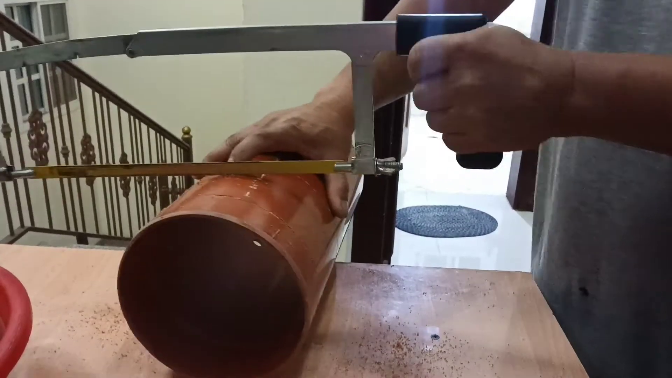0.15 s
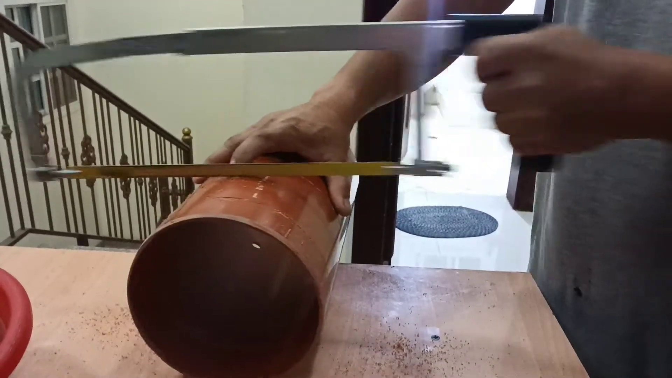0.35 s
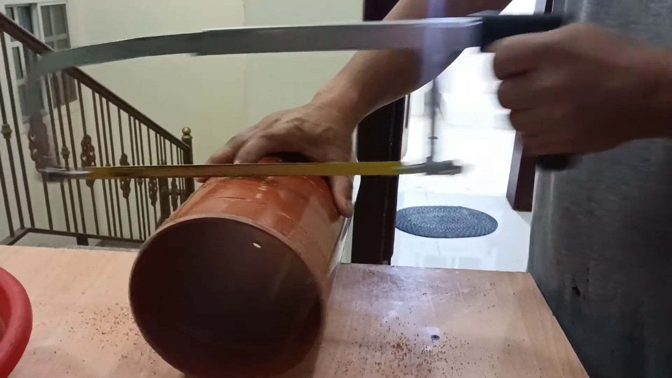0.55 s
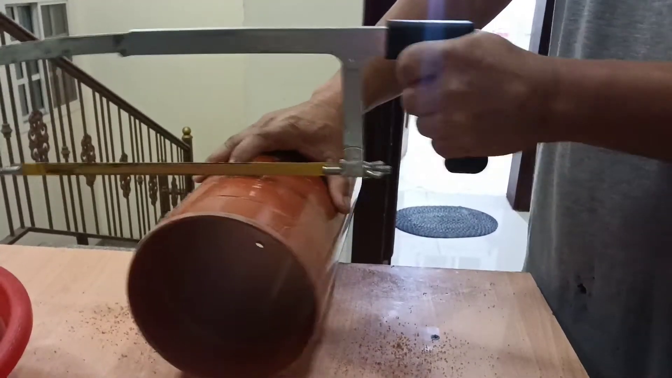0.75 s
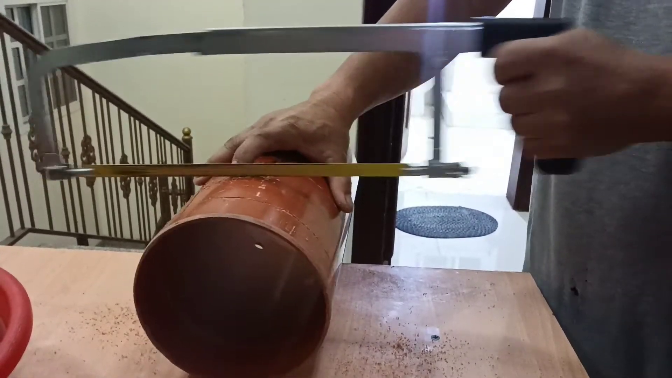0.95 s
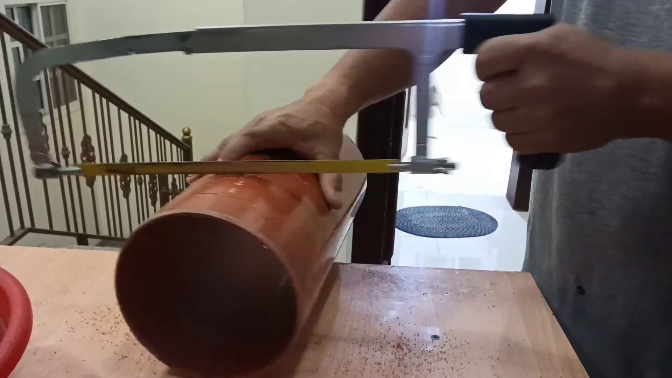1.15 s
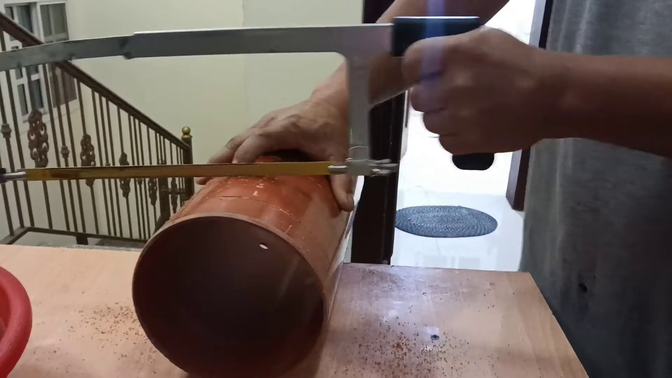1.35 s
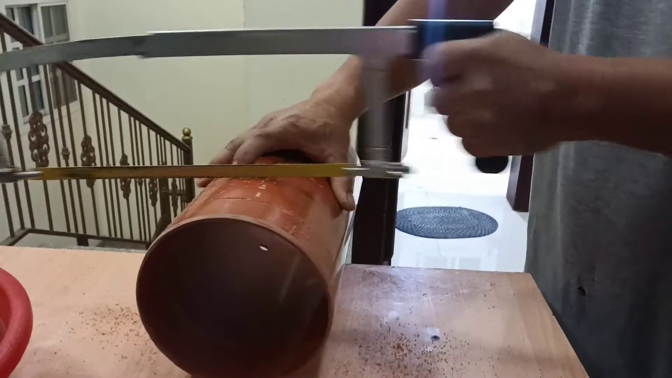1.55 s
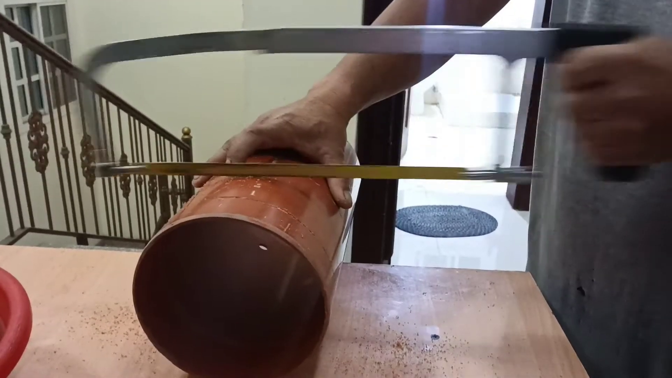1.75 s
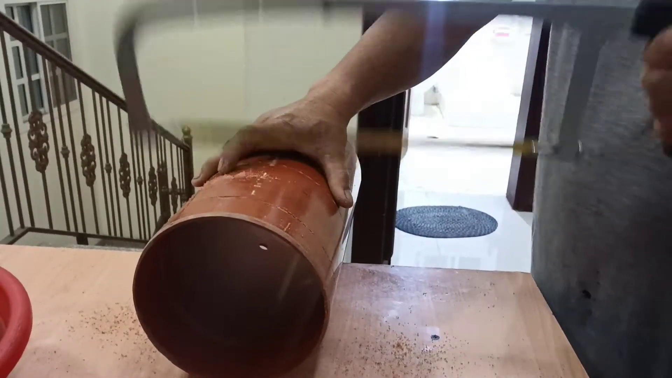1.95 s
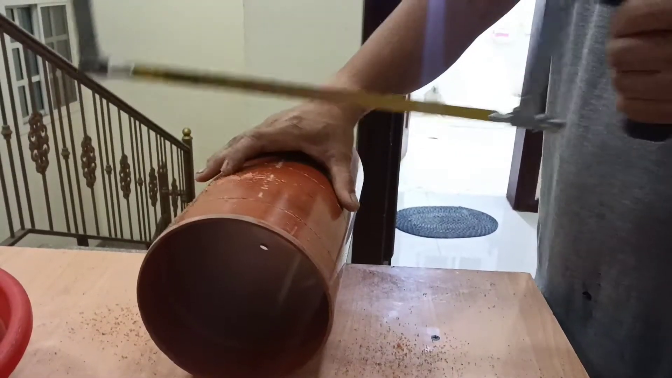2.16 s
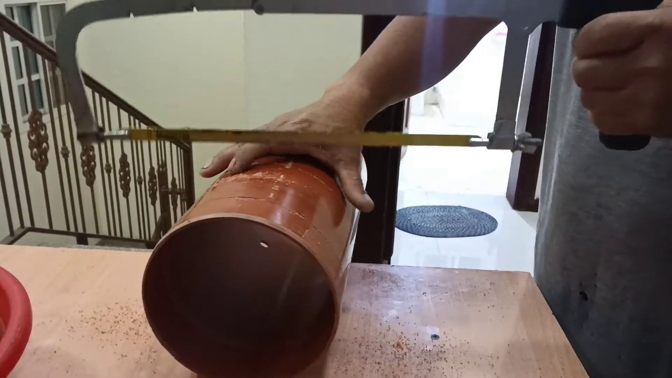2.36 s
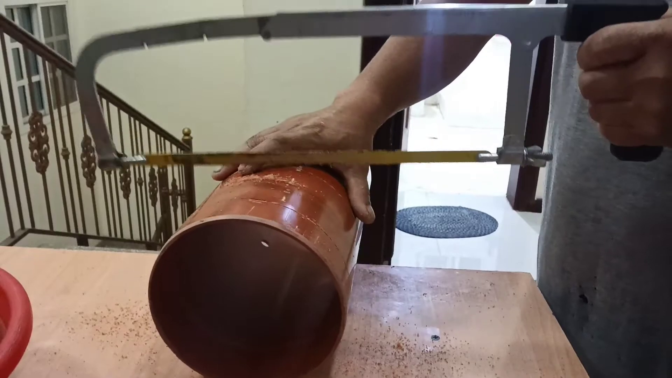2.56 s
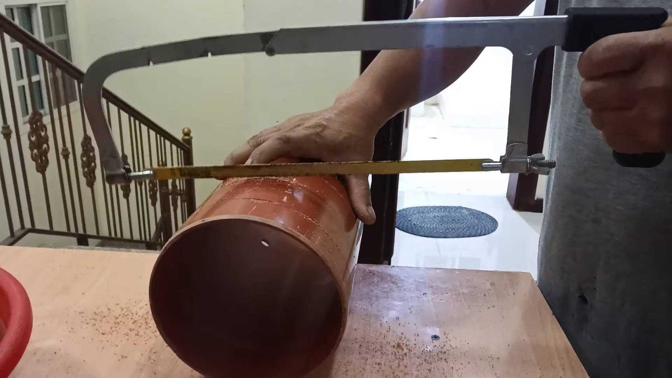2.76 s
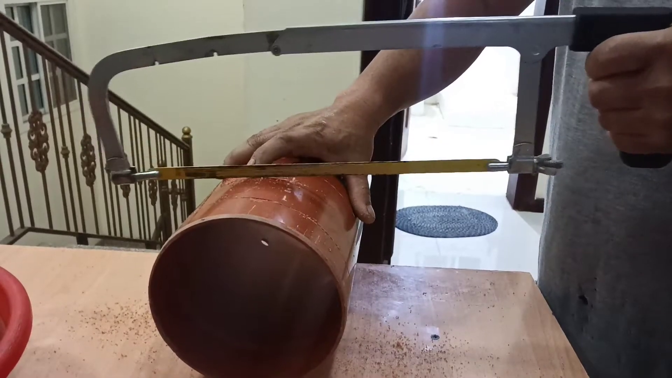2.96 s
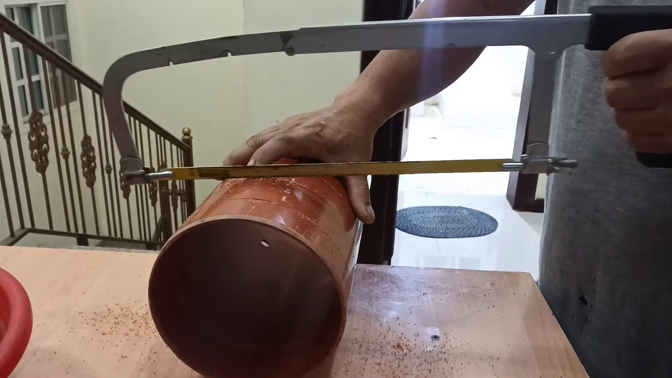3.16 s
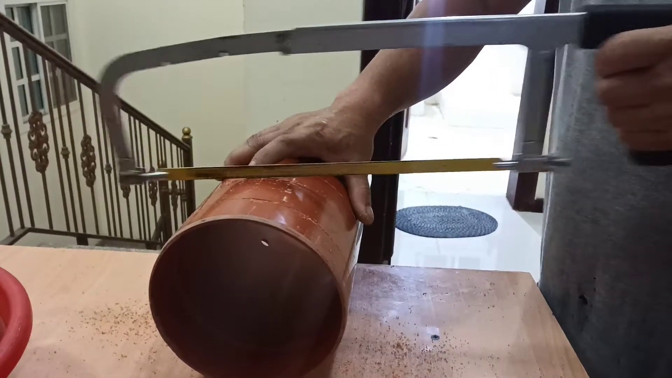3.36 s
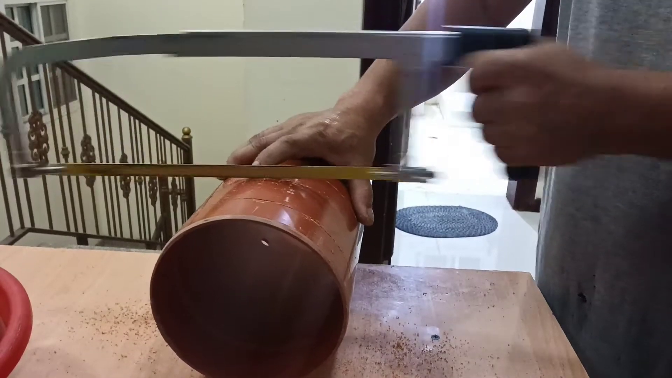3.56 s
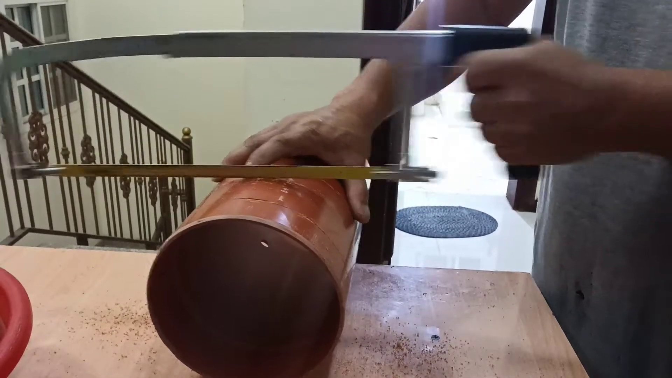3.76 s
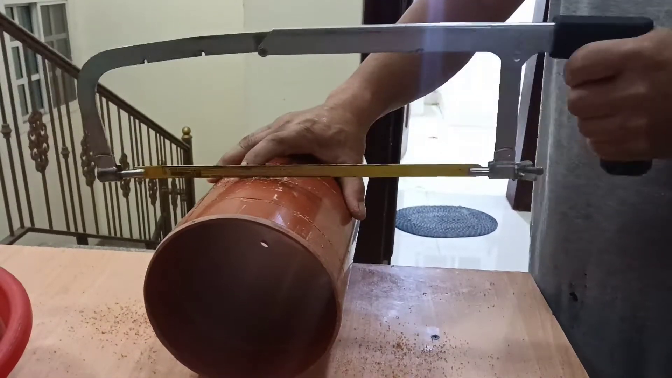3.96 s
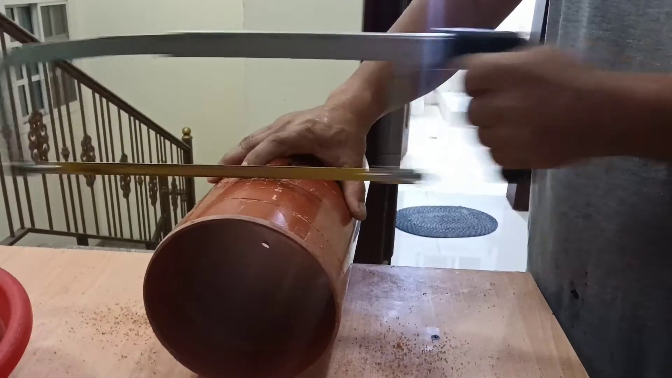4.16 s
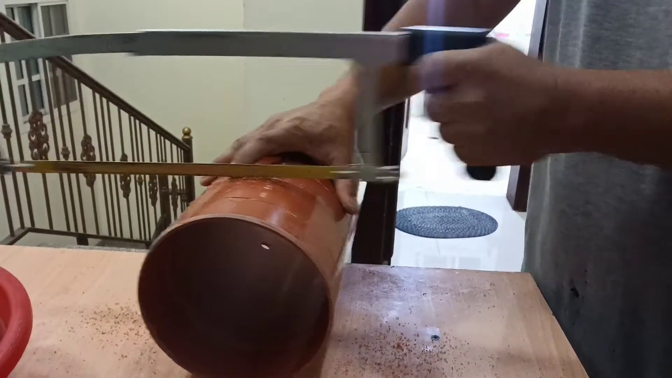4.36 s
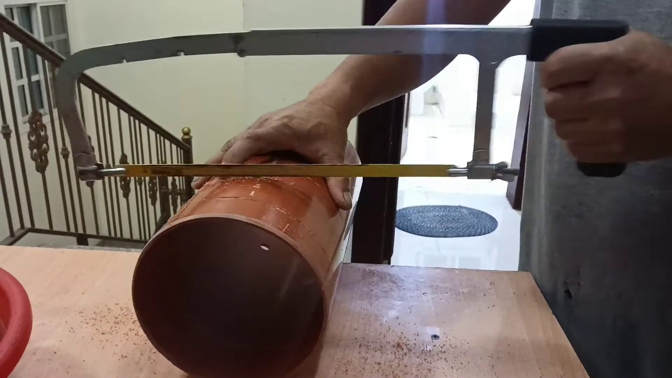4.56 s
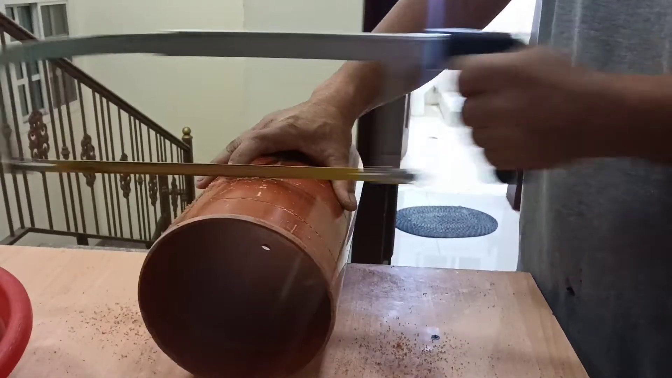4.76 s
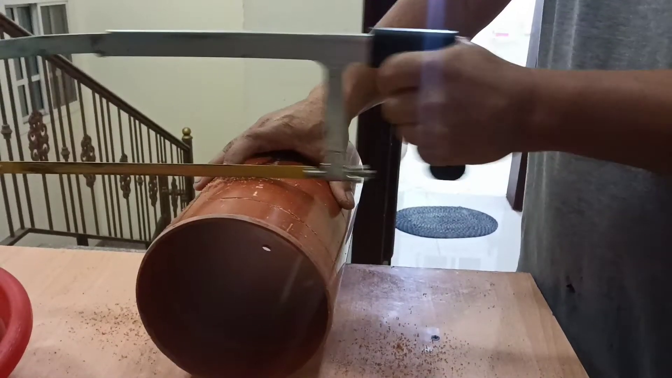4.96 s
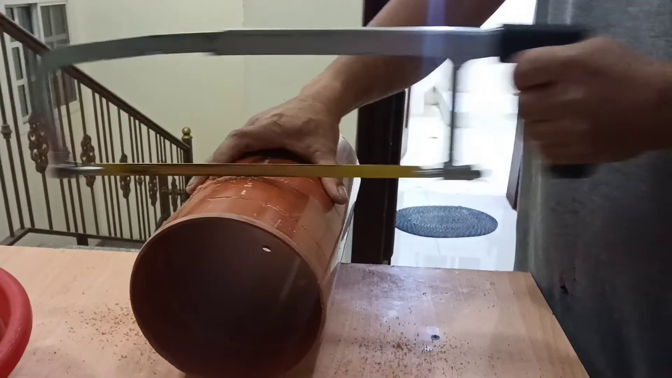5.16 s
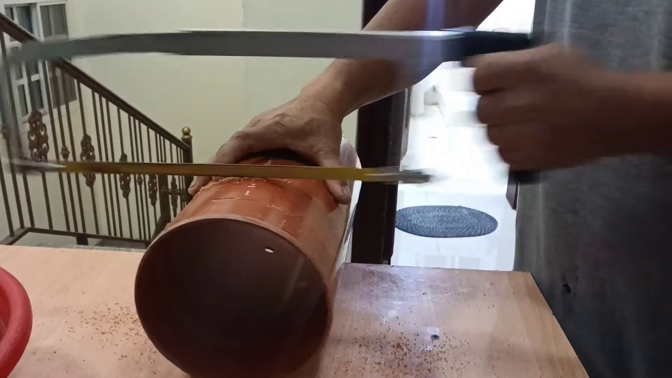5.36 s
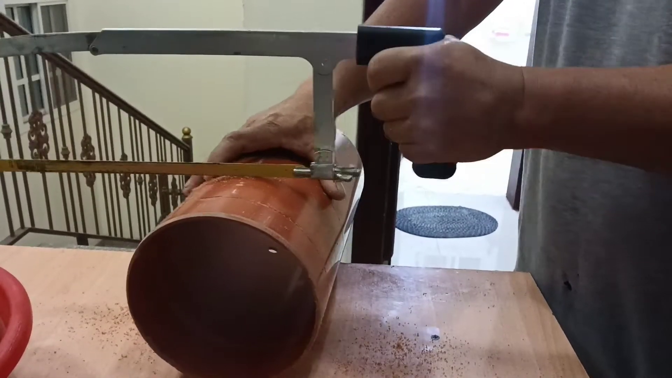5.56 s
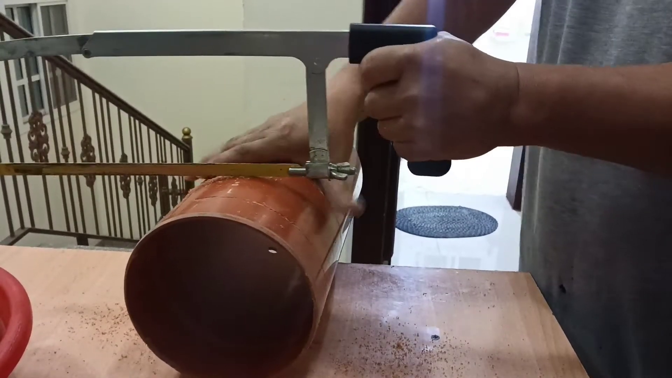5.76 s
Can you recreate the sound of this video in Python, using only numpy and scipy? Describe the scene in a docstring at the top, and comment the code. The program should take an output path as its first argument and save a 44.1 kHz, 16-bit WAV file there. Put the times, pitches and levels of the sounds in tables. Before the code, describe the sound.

A hacksaw rasps back and forth through a wide hollow plastic pipe in two runs, with knocks between them and twanging blade near the end.

```python
"""First a rasping stroke with a hard bite, then push and pull in turn: a hacksaw cuts a wide plastic pipe
on a bench by an open door, in two runs. Random tooth bites excite pipe, steel frame and bench as resonators;
teeth in step with the pipe sing as gliding tones, and the taut blade twangs as a plucked string when a stroke
jams. Between the runs the saw is set down on the pipe: impulses through modes, skids and faint scrapes.
A hard-walled landing answers with sparse echoes, over the shaped noise of distant street and house hum."""
import sys
import numpy as np
from scipy import signal
from scipy.fft import rfft, irfft, next_fast_len
from scipy.io import wavfile

SR = 44100
rng = np.random.default_rng(int(sys.argv[2]) if len(sys.argv) > 2 else 0)


def transcribe(signal):
    """Save signal, clipped to [-1, 1], as a 16-bit WAV file at the path in sys.argv[1]."""
    frames = np.atleast_2d(signal).T
    limited = np.clip(frames, -1, 1)
    pcm = np.round(limited * 32767).astype(np.int16)
    wavfile.write(sys.argv[1], SR, pcm)


N = 256220

# All layer levels are relative; the mixes below add trims.
# Saw strokes, pushes and pulls in turn, a push first: start_s, rise_s, length_s, rasp_db, drift_to_end_db,
# first_bite_db, grind_over_rasp_db, fizz_over_rasp_db, hum_over_rasp_db, tooth pace at start_hz, middle_hz,
# end_hz, hum_joins_after_s, hum_drift_db
STROKES = [ (0.0, 0.0017, 0.13, -33, -5, 14, 4, -3.5, 12, 503, 501, 505, 0.0056, -3.5),
           (0.25, 0.048, 0.13, -24, -9, 4, 4.5, -11, 12.8, 682, 714, 658, .01, 5.5),
           (0.51, 0.033, 0.14, -25, 0.5, 2, -0.5, -3, 6.5, 713, 526, 484, .005, 0),
           (0.78, 0.061, 0.15, -24.5, -2.5, -0.5, 3, -9.5, 12.2, 668, 660, 728, 0.011, 3.5),
           (1.158, 0.029, 0.21, -25.5, -6.5, 8, 1, -5, 12.5, 630, 497, 485, .005, -6),
           (1.47, 0.14, 0.33, -18.5, -7.5, 0.5, 3, -10.5, 7.7, 650, 726, 553, 0.13, 7.5),
           (3.30, 0.029, 0.27, -25.5, 1.5, -10.5, -1.5, -4.5, 4.7, 718, 592, 530, 0.022, 2.5),
           (3.69, 0.1, 0.21, -22.5, -11, 6.5, 1.5, -7, 8.9, 634, 528, 592, 0.015, 6.5),
           (4.0, 0.021, 0.2, -25, 0, 1, -3.5, -3.5, 7.9, 677, 547, 515, 0.028, -4),
           (4.30, 0.017, 0.2, -25.5, -0.5, 2, 7, -13.5, 8.1, 513, 576, 644, 0.0075, 11),
           (4.61, 0.011, 0.18, -25.5, 2.5, -4.5, 2.5, -4, 14.6, 595, 626, 493, .01, -2),
           (4.92, 0.078, .24, -28.5, -4.5, 7, 7.5, -8.5, 18.5, 470, 516, 555, 0.016, 2.5),
           (5.25, 0.025, 0.17, -27, 2.5, 1, 3, -3, 12.2, 538, 546, 492, .01, 1),
           (5.47, 0.044, 0.21, -46, -32, -17, 14, -24, 32, 487, 470, 461, .01, -2), ]
# Spectra of the scraped wall (rasp), the low grind and the torn swarf (fizz): frequency_hz, density_db
RASP_SPECTRUM = [(2180, -26.5), (3700, -8.5), (3840, -1.5), (4230, -9.5), (4710, -6.5), (5680, -1),
                 (6220, -6.5), (8500, -12.5), (9090, -22), (10000, -20), (13000, -35), (22000, -120)]
GRIND_SPECTRUM = [(880, -50.5), (1500, -13), (2070, -4.5), (2170, -5), (2330, -1.5), (2410, 1), (2520, -7),
                  (2750, -1.5), (3140, -7), (3570, -5), (3900, -17), (5070, -30), (8580, -120)]
FIZZ_SPECTRUM = [(5290, 2.5), (9000, -2.5), (10100, 4), (11900, 9.5), (14700, 4), (15400, -7)]
# Modes of steel frame, pipe and bench: frequency_hz, width_hz (before the sharpness factor), level_db
FRAME_MODES = [(2090, 40, 0), (2230, 18, 2.5), (2318, 180, -14.5), (2680, 35, -10), (2670, 65, -37),
               (3480, 68, -15), (3635, 130, 2), (4135, 135, -4), (4450, 45, -26), (5570, 81, -4),
               (5350, 42, -31), (6550, 39, -11)]
PIPE_MODES = [(326, 130, -37), (417, 193, -25.5), (502.7, 20.5, 6.5), (525.4, 30, -1.5), (646, 64, -5),
              (695.5, 180, -2.5), (754, 69, 4), (799, 65, -6.5), (851, 78, 0), (1242, 120, -7),
              (1422, 47, -9.5), (1553, 40, -2.5)]
BENCH_MODES = [(46, 15, -9.5), (67.5, 9.3, 2.5), (105.7, 17, 8), (155, 23, -8.5)]
# Bench rocking under the strokes: middle_s, length_s, level_db
JOLTS = [(0.438, 0.29, -33.5), (0.694, 0.35, -35.5), (0.948, 0.23, -20.5), (1.218, 0.047, -25.5),
         (1.31, 0.066, -28), (1.756, 0.36, -27.5), (3.57, 0.11, -33), (3.865, 0.23, -23),
         (4.076, 0.094, -22), (4.189, 0.21, -34.5), (4.556, 0.33, -27), (4.76, 0.062, -22),
         (5.132, 0.26, -21.5), (5.409, 0.11, -17)]
# Teeth locked to a pipe mode: start_s, length_s, start_pitch_hz, end_pitch_hz, level_db, share_before_top
SINGING_NOTES = [(0.0, 0.17, 489.5, 479, -12.5, 0.11), (0.266, 0.044, 715, 700, -17.5, 1),
                 (0.654, 0.051, 482.6, 497, -20, 0.61), (0.895, 0.082, 700, 746, -32, .4),
                 (3.34, 0.048, 691, 712, -12, 0.97), (3.764, 0.13, 522, 533.6, -13, 0.32),
                 (4.126, 0.1356, 482.5, 503, -11, 0.96), (4.313, 0.18, 503, 622, -18, 0.71),
                 (4.473, 0.057, 547.4, 505, -17.5, 0.53), (5.026, 0.03, 490, 510, -6, 0.57)]
# Blade twangs: start_s, length_until_damped_s, level_db
TWANGS = [(4.786, .63, -5), (5.42, .45, -3.5)]
# Upper partials of the blade: multiple, level_db
UPPER_PARTIALS = [(3, 4.5), (4, 2), (5, 3.5), (6, -0.5), (7, -7), (8, -19), (9, -39), (10, -21)]
# Saw laid on the pipe: start_s, pipe_knock_db, bench_thud_db, steel_tick_db, skid_db, skid_length_s
KNOCKS = [(2.719, -19.5, -20, -42, -77, 0.043), (2.85, -15.5, -22, -31, -74, 0.22),
          (3.061, -51.5, -35, -65, -56, 0.051), (3.134, -53, -53, -31.5, -42.5, 0.048)]
# First contact of steel, one broad mode: frequency_hz, width_hz (before the sharpness factor), level_db
STEEL_CRACK = (2700, 4200, -12)
# Spectrum of the skidding blade: frequency_hz, density_db
SKID_SPECTRUM = [(1180, -62), (2000, -27), (2410, -23), (2510, -23), (2660, -12), (3490, 7), (4200, -17),
                 (4420, 0), (7710, -8), (9510, -14), (15000, -5.5)]
# Faint scrapes and squeaks while the saw is moved: start_s, length_s, frequency_hz, width_hz, level_db
SCRAPES = [(2.084, 0.16, 7670, 202, -77), (2.301, 0.14, 5350, 258, -62), (2.64, .07, 5800, 119.7, -69),
           (2.55, 0.57, 2225, 90.6, -54.5), (2.863, 0.18, 5140, 250, -62), (2.87, .2, 527, 115, -42.5),
           (2.94, 0.091, 7760, 400, -69), (2.97, 0.038, 3480, 60, -46.5), (3.22, 0.11, 1056, 60.3, -55.5)]
# Reverberation time of the landing: frequency_hz, t60_s
WALL_DECAY = [(100, 0.23), (500, 0.52), (2000, 0.37), (6000, 0.37), (14000, 0.23)]
# Reflected over direct sound: frequency_hz, level_db
WALL_LEVEL = [(100, -16), (250, -16), (480, -13), (650, -7), (900, -2), (2000, -1), (6000, 1), (14000, 2)]
# Spectrum of the air: frequency_hz, density_db
AIR_SPECTRUM = [(15, -68), (25, -38), (59, -2), (119, -0.5), (198, 0), (233, -13), (281, -4.5),
                (339, -16.5), (377, -9), (845, -26.5), (1610, -27.5), (4470, -37.5), (5260, -35),
                (6010, -42), (15400, -60)]
# Shape of the left-right balance, scaled separately for each channel: frequency_hz, balance_db
BALANCE = [(60, 4), (99, -1.5), (160, -0.5), (270, 1.5), (450, -0.5), (740, 1), (1220, 1.5), (2010, -0.5),
           (3320, 1.5), (5480, 1), (9050, -2.5), (15000, -1)]

# Stroke settings; pairs are (push, pull)
RISE_POWER, BITE_S, LAG_DB_PER_S = (0.73, 1.4), 0.02, 595.5
LET_GO_DB_PER_S = (800, 327)
LINGER_DB, LINGER_DB_PER_S = (16, 27), (60, 85)  # the blade drags faintly through the turn
GRIND_FOLLOWS, FIZZ_FOLLOWS, HUM_FOLLOWS = 0.7, 1.22, 0.77  # dB for each dB of pressure

# Blade settings; triples are (first, second, upper partials)
BLADE_HZ, TIGHT_HZ, TIGHT_S = 454.8, 24.86, 0.0405  # the pitch starts sharp and settles
SWAY_HZ, SWAY_DB = 5.44, -2  # the sideways swing lies a little higher and beats with the first
ENTER_S, BLOOM_S, BLOOM_DB = (0, 0.037, 0.036), (0.0068, 0.013, 0.029), (-2, -6.5, -25)
SPURT_DB, SPURT_S, RING_DB_PER_S = (8.5, 9.5, 3.5), 0.12, (17.5, 29, 28.5)  # quick loss, then slow

SKID_DB_PER_S = 107
AIR_DB = -50.5
EDGE_HZ = 15500


def saw():
    """Friction excitation: random bites scrape the wall, ring the frame, boom in the pipe and shake the bench."""
    (rasp_gain, grind_gain, fizz_gain, hum_gain), pace_hz = strokes()
    teeth = bites(per_s=5000, spread_db=3.0) * judder(width_hz=61.8, depth_db=4.5)
    rasp = evened(coloured(teeth, RASP_SPECTRUM))

    # the contact point travels along the blade, so three sets of modes swell separately
    steel = 0
    for k in range(3):
        steel = steel + judder(width_hz=6, depth_db=4) * ring(teeth, FRAME_MODES[k::3], 1.1)
    grind = evened(coloured(teeth, GRIND_SPECTRUM)) + gain_of(-11) * evened(steel)

    # swarf tearing off
    chips = bites(per_s=4000, spread_db=3.5) * judder(width_hz=60.4, depth_db=4.5)
    fizz = evened(coloured(chips, FIZZ_SPECTRUM))

    # a nearly even tooth pace: a fuzzy note that glides with the speed of the stroke
    paced = evened(resonate(resonate(teeth, pace_hz, 49), pace_hz, 182))
    boom = gain_of(-2.5) * evened(ring(teeth, PIPE_MODES))
    hum = (paced + boom) * judder(width_hz=24.64, depth_db=2.0)

    rocking = np.zeros(N)
    for middle, length, db in JOLTS:
        rocking += gain_of(db) * np.cos(np.pi * np.clip(since(middle) / length, -0.5, 0.5))
    bench = rocking * evened(ring(chips, BENCH_MODES))

    return (gain_of(-2.0) * rasp_gain * rasp + gain_of(1) * grind_gain * grind
            + gain_of(1.5) * fizz_gain * fizz + gain_of(-9.0) * hum_gain * hum + gain_of(-7.5) * bench)


def strokes():
    """Pressure drives level: each layer follows the press of a stroke by its own law; the tooth pace glides."""
    gains, pace_marks = np.zeros((4, N)), []
    follow_rates = [1, GRIND_FOLLOWS, FIZZ_FOLLOWS, HUM_FOLLOWS]
    for k, stroke in enumerate(STROKES):
        s, rise, length, rasp_db, drift_db, bite_db, grind_db, fizz_db, hum_db = stroke[:9]
        *pace_hz, lag, hum_drift_db = stroke[9:]
        way = k % 2  # 0 push, 1 pull
        t = since(s)
        share = np.clip(t / length, 0, 1)
        after = np.maximum(t - length, 0)

        swell_db = RISE_POWER[way] * 20 * np.log10(np.clip(t / rise, 1e-4, 1))
        first_bite_db = bite_db * np.exp(-np.maximum(t - rise, 0) / BITE_S)
        slack_db = np.minimum(LET_GO_DB_PER_S[way] * after, LINGER_DB[way] + LINGER_DB_PER_S[way] * after)
        press_db = swell_db + drift_db * share + first_bite_db - slack_db

        layers_db = np.outer(follow_rates, press_db)
        layers_db[3] += hum_drift_db * share - LAG_DB_PER_S * np.maximum(lag - t, 0)
        offsets_db = np.array([[0], [grind_db], [fizz_db], [hum_db]])
        gains += (t > 0) * gain_of(rasp_db + layers_db + offsets_db)
        pace_marks += zip((s, s + length / 2, s + length), pace_hz)
    return gains, np.interp(since(0), *np.transpose(sorted(pace_marks)))


def singing():
    """Mode locking: a wavering, gliding tone where the teeth fall in step with the pipe."""
    out = np.zeros(N)
    waver = judder(width_hz=86, depth_db=0.41)  # of pitch
    flutter = judder(width_hz=30, depth_db=1.0)  # of level
    for s, length, from_hz, to_hz, db, top in SINGING_NOTES:
        share = np.clip(since(s) / length, 0, 1)
        turns = np.cumsum((from_hz + (to_hz - from_hz) * share) * waver) / SR
        swell = np.interp(share, [0, np.clip(top, 0.05, 0.95), 1], [0, 1, 0])
        out += gain_of(db + 2.0) * swell * np.cos(2 * np.pi * turns)
    return flutter * out


def blade():
    """Plucked string: the first harmonic partial speaks at once, the others a moment later; they fall fast
    then slowly, and beat with a sideways swing."""
    out = np.zeros(N)
    for s, length, twang_db in TWANGS:
        t = np.maximum(since(s), 0)
        hz = BLADE_HZ + TIGHT_HZ * np.exp(-t / TIGHT_S)
        turns = np.cumsum(hz * judder(width_hz=120, depth_db=0.07)) / SR  # the tension wavers
        damped = np.clip((length - t) / 0.01, 0, 1)
        for k, db in [(1, 0.0042), (2, 0.0055)] + UPPER_PARTIALS:
            group = min(k, 3) - 1
            phase = k * turns + rng.random()
            late = np.maximum(t - ENTER_S[group], 0)
            loss_db = SPURT_DB[group] * (1 - np.exp(-late / SPURT_S)) + RING_DB_PER_S[group] * t
            level = gain_of(twang_db + db + BLOOM_DB[group] - loss_db)
            sideways = gain_of(SWAY_DB) * np.cos(2 * np.pi * (phase + k * SWAY_HZ * (late - 0.025)))
            swing = np.cos(2 * np.pi * phase) + sideways
            held = np.clip(late / BLOOM_S[group], 0, 1) * damped
            uneven = judder(width_hz=40.6, depth_db=5.4 * np.clip(late / 0.11, 0, 1))
            out += held * level * uneven * swing
    return out


def handling():
    """Impulse response: knocks ring pipe, bench and frame; friction noise gives the skids and scrapes."""
    starts, *levels_db, skids_db, skids_s = np.transpose(KNOCKS)
    out, click = np.zeros((2, N))
    click[0] = 1
    # the blow lands over the upper pipe modes
    hollow = resonate(click, 656, 100) + 0.71 * resonate(click, 630, 40) + 0.018 * click
    push = resonate(click, 46, 39.0)  # the weight settles slowly on the bench
    bodies = [(hollow, PIPE_MODES, 0.9), (push, BENCH_MODES, 0.8), (click, FRAME_MODES + [STEEL_CRACK], 0.6)]
    for db, (blow, modes, sharp) in zip(levels_db, bodies):
        blows = np.zeros(N)
        blows[np.round(starts * SR).astype(int)] = gain_of(db)
        response = ring(blow, modes, sharp)[:SR // 2]
        out += signal.oaconvolve(blows, response / abs(response).max())[:N]

    grit = bites(per_s=5000, spread_db=3)
    skid = np.zeros(N)
    for start, db, length in zip(starts, skids_db, skids_s):
        t = since(start)
        skid += gain_of(db - SKID_DB_PER_S * t) * (t > 0) * np.clip((length - t) / 0.039, 0, 1)
    out += skid * evened(coloured(grit, SKID_SPECTRUM))

    for start, length, hz, width, db in SCRAPES:
        swell = np.sin(np.pi * np.clip(since(start) / length, 0, 1))
        out += gain_of(db) * swell * evened(ring(grit, [(hz, width, 0)]))
    return out


def landing(x):
    """Reverberation: direct sound, a little late on the left, and sparse reflections dying band by band."""
    taps = np.zeros((2, SR // 2))
    at = np.arange(100, SR // 2 - 20, 20)
    at = at + rng.integers(0, 20, (2, len(at)))  # one reflection at random in every 20 samples
    np.put_along_axis(taps, at, rng.choice([-1., 1.], at.shape), 1)
    hz, t, bands = signal.stft(taps, SR, nperseg=256)
    decay = gain_of(-60 * t / read(WALL_DECAY, hz)[:, None])
    tail = signal.istft(bands * decay, SR, nperseg=256)[1]
    tail = tail / np.linalg.norm(tail[0])
    echo = signal.fftconvolve(coloured(x, WALL_LEVEL)[None], tail, axes=1)[:, :N]
    return np.array([np.roll(x, 6), x]) + echo


def air():
    """Diffuse field: distant street and house hum as shaped noise, alike in both ears only in the bass."""
    shared, left, right = rng.standard_normal((3, N))
    separate = 2.7 * coloured(np.array([left, right]), WALL_LEVEL)  # weak in the bass
    return gain_of(AIR_DB) * evened(coloured(shared + separate, AIR_SPECTRUM))


def bites(per_s, spread_db):
    """Impulsive excitation: random tooth bites, clicks of either sign, a few of them large; rms 1."""
    draw = rng.random((3, N))
    size = gain_of(-spread_db * np.log(np.clip(draw[0], 1e-2, 1)))
    return evened(size * np.sign(draw[1] - 0.5) * (draw[2] < per_s / SR))


def judder(width_hz, depth_db):
    """Random modulation: a randomly wandering factor, slow or fluttering by its width."""
    wander = resonate(rng.standard_normal(N), 0, width_hz)
    return gain_of(depth_db * evened(resonate(wander, 0, width_hz)))


def ring(x, modes, sharp=1):
    """Modal superposition: a drive passes through modes of alternating sign."""
    out = 0
    for k, (hz, width, db) in enumerate(modes):
        # two poles a mode leave dark valleys between the peaks
        r = np.exp(-np.pi * width * np.array([sharp, 1.68 * sharp]) / SR)
        poles = r * np.exp(2j * np.pi * hz / SR)
        mode = signal.lfilter([np.prod(1 - r)], np.poly(poles), x).real
        out = out + (-1) ** k * gain_of(db) * mode
    return out


def resonate(x, hz, width):
    """Heterodyne resonance: shifts a frequency, fixed or gliding, to zero, smooths, and shifts back."""
    turn = np.exp(2j * np.pi * np.cumsum(hz * np.ones(N)) / SR)
    r = np.exp(-np.pi * width / SR)
    return 2 * (turn * signal.lfilter([1 - r], [1, -r], x / turn)).real


def coloured(x, points, sign=1):
    """Linear filtering: weights the spectrum by a curve in dB times sign."""
    size = next_fast_len(N)
    gain = gain_of(sign * read(points, np.fft.rfftfreq(size, 1 / SR)))
    return irfft(rfft(x, size) * gain, size)[..., :N]


def read(points, hz):
    """Interpolation: reads a curve on a log-frequency axis."""
    f, value = np.transpose(points)
    return np.interp(np.log(hz + 1), np.log(f + 1), value)


def evened(x):
    """Normalisation: scales to rms 1."""
    return x / np.sqrt(np.mean(x ** 2) + 1e-20)


def gain_of(db):
    """Level law: decibels to amplitude gain."""
    return 10 ** (np.asarray(db) / 20)


def since(s):
    """Time axis: seconds since a moment."""
    return np.arange(N) / SR - s


def scene():
    """Superposition: all sources on the landing, with the air around them."""
    return landing(saw() + singing() + blade() + handling()) + air()


def record(dry):
    """Transmission chain: channel balance, soft overload, band limit."""
    balanced = np.array([coloured(dry[0], BALANCE, 0.057), coloured(dry[1], BALANCE, -1.19)])
    soft = balanced / (1 + abs(balanced) ** 6) ** (1 / 6)
    lowpass = signal.firwin(1023, EDGE_HZ, window=("kaiser", 9), fs=SR)
    return signal.oaconvolve(soft, lowpass[None], "same")


dry = scene()
out = record(dry)
transcribe(out)
```